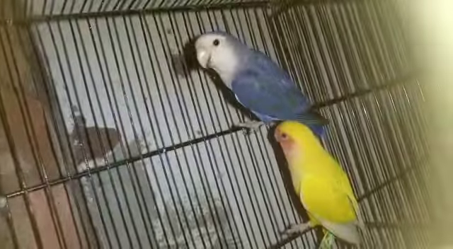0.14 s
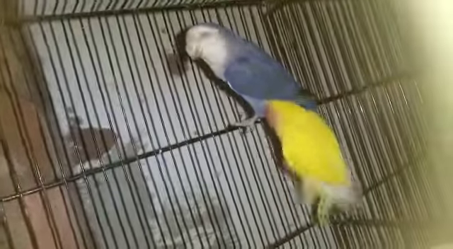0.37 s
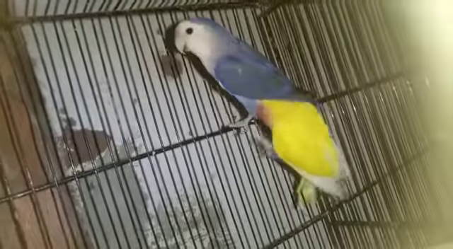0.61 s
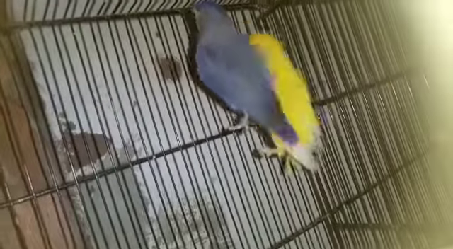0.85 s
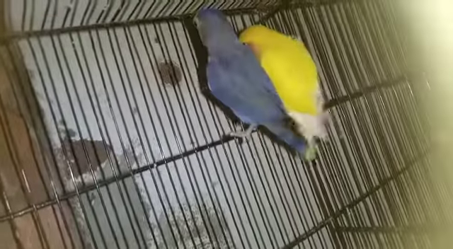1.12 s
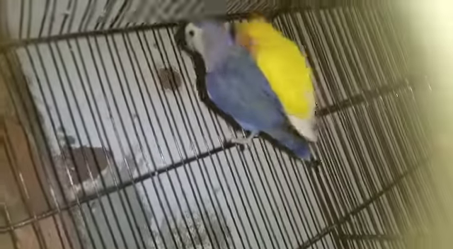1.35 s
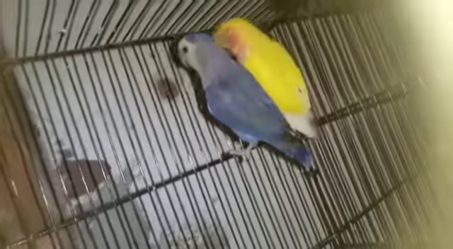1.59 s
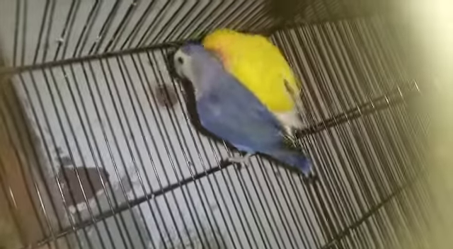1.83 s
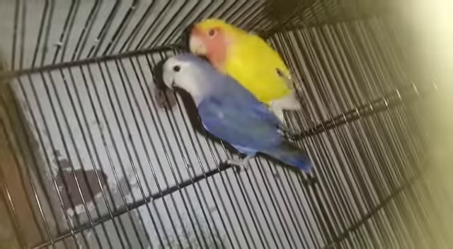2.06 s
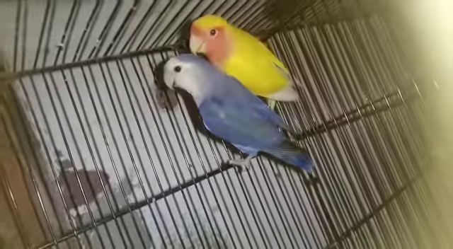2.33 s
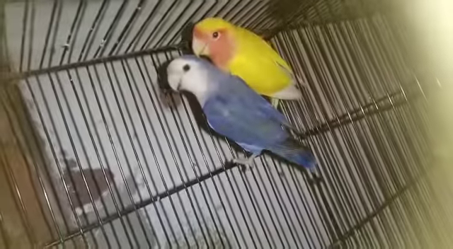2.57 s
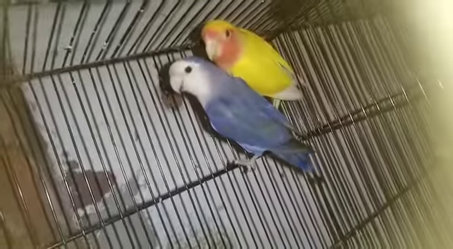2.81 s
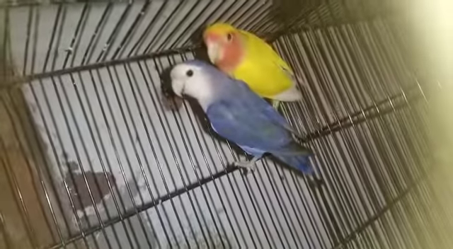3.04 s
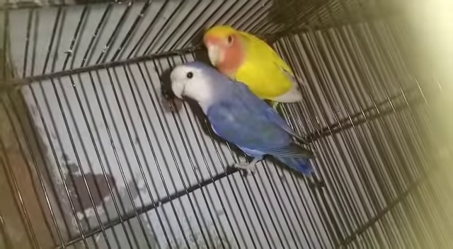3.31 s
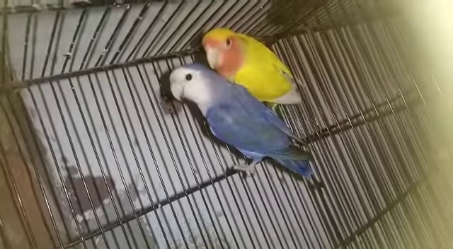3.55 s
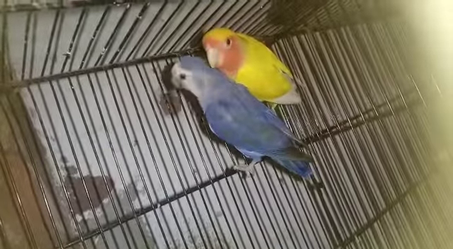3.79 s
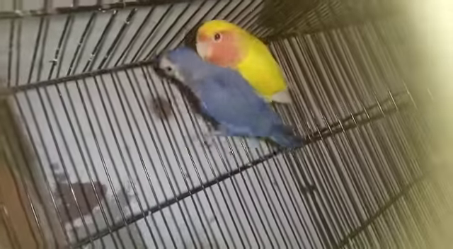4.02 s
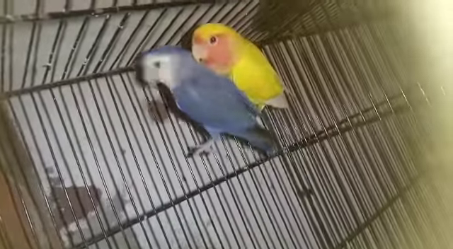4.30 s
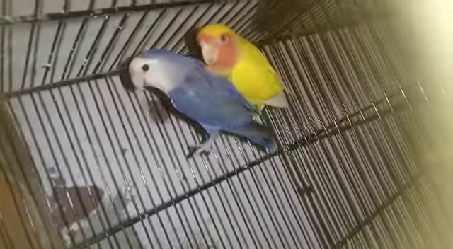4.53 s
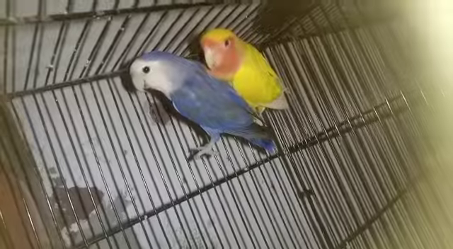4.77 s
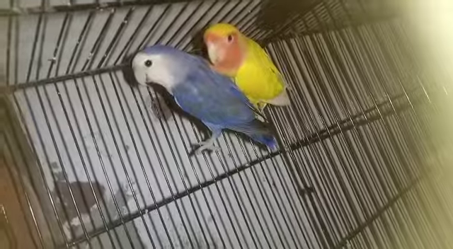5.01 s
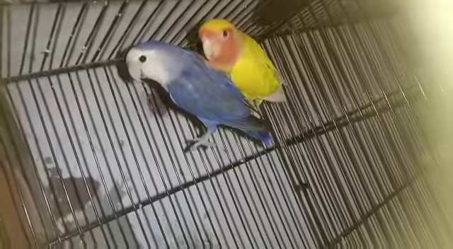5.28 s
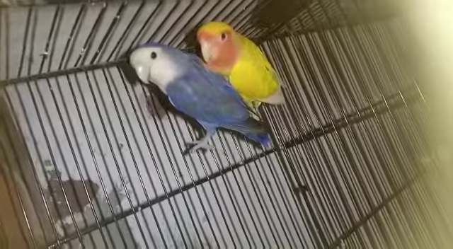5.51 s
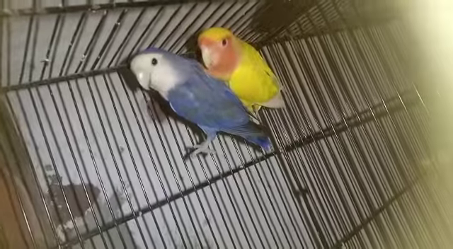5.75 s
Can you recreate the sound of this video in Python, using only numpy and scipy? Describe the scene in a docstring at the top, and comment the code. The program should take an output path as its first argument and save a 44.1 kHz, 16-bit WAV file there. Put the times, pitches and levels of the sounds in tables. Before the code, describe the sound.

Quiet indoor room with a faint low hum and slight hiss. One abrupt high squawk, light ticking on cage wires and soft rustling, then a rapid chatter of dry clicks, a short accelerating trill and two separate shrill chirps. Afterwards it is nearly still, with faint far notes. Close, bright microphone, short reverberation, slightly strained on the loud calls.

```python
"""Three shrill calls, a burst of chatter and a rolled call ending on a held note, from two lovebirds close by
in a small hard room. Claws and beaks tick on the cage wires, feathers rustle, the house hums low; faint far notes
and a few faint narrow ticks lie behind. The voices are sums of overtones shaped by throat and beak, the wire
ticks are noise bursts with decaying sines, and the background is filtered noise. The loudest notes overload the
microphone on one side, and the gain control ducks under them."""
import sys
import numpy as np
from scipy import signal
from scipy.fft import rfft, irfft, next_fast_len
from scipy.io import wavfile
from scipy.ndimage import uniform_filter1d, minimum_filter1d, map_coordinates

SR = 44100
rng = np.random.default_rng(int(sys.argv[2]) if len(sys.argv) > 2 else 0)


def rack_gain(trim_db):
    """Turn a fader trim in dB into the linear factor to multiply a signal by."""
    fader = np.asarray(trim_db, float)
    return 10 ** (fader / 20)


def wrap_up_sound(samples):
    """Save the sound to the file named by the first command line argument, as 16-bit audio."""
    columns = np.atleast_2d(samples).T
    # keep every value between -1 and 1, then stretch to whole-number steps
    tamed = np.clip(columns, -1, 1)
    steps = np.round(tamed * 32767).astype(np.int16)
    wavfile.write(sys.argv[1], SR, steps)


N = 259175  # samples


def unit(x):
    """Normalisation to an rms of 1."""
    return x / np.sqrt(np.mean(np.abs(x) ** 2) + 1e-20)


def along(points, hz):
    """Interpolation of (Hz, value) points on a logarithmic frequency axis."""
    f, v = np.transpose(points)
    return np.interp(np.log(hz + 1), np.log(f + 1), v)


def filtered(x, response):
    """Linear filtering: the spectrum of x times a complex response of frequency."""
    m = next_fast_len(len(x) + 8192)
    return irfft(rfft(x, m) * response(np.fft.rfftfreq(m, 1 / SR)), m)[:len(x)]


def add(track, s, sound):
    """Superposition: a sound joins the track at s seconds."""
    track[round(s * SR):][:len(sound)] += sound


def rush(spectrum, patchy_db, size):
    """Coloured noise of rms 1, its gain varying in patches of size (frequency bins, time frames)."""
    z = signal.stft(rng.standard_normal(N + 512), nperseg=512)[2]
    field = uniform_filter1d(rng.standard_normal(z.shape), size[0], 0)
    field = uniform_filter1d(field, size[1], 1)
    noise = signal.istft(z * rack_gain(patchy_db * unit(field)), nperseg=512)[1][:N]
    return unit(filtered(noise, lambda hz: rack_gain(along(spectrum, hz))))


# Spectrum of the house hum. Each row: frequency in Hz, relative density in dB per Hz.
HUM_SPECTRUM = [(24, -66), (40, -47), (75, -13.5), (113, 1), (269, -9.5), (345, -18.5), (382, -9.5),
                (407, -26), (800, -27.5), (1040, -53), (1760, -120)]
HUM_DB, HUM_WAVER_DB, WAVERS_A_SECOND = -59, 1.8, 6


def house_hum():
    """Amplitude modulation: a slow random waver in dB on low-frequency noise."""
    t = np.arange(N) / SR
    waver = map_coordinates(rng.standard_normal(100), [t * WAVERS_A_SECOND])
    return rack_gain(HUM_DB + HUM_WAVER_DB * waver) * rush(HUM_SPECTRUM, patchy_db=2.5, size=(3, 6))


# Spectrum of the quiet room. Each row: frequency in Hz, relative density in dB per Hz.
HISS_SPECTRUM = [(530, -40.5), (900, -19), (1530, -16.5), (1660, -7.5), (3620, -34.5), (3750, -13),
                 (4280, -30), (4880, -5.5), (12600, -38.5), (15800, -5)]
HISS_DB = -77.5


def quiet_hiss():
    """Stationary coloured noise: a faint hiss of constant mean level."""
    return rack_gain(HISS_DB) * rush(HISS_SPECTRUM, patchy_db=3.5, size=(3, 14))


# Spectrum of the stirring in the room. Each row: frequency in Hz, relative level in dB.
STIR_SPECTRUM = [(290, -16), (500, -10), (1080, -12), (1380, -9), (1680, -9), (2660, -12.5), (3200, -19),
                 (4160, -38), (7040, -120)]
# Spectrum of the feathers. Each row: frequency in Hz, relative level in dB.
RUSTLE_SPECTRUM = [(1760, -27.5), (3000, -12.5), (4280, -3.5), (5770, -4), (6440, 2), (7880, -8.5),
                   (12400, -3), (14900, -5.5), (15800, -30)]
# How busily things stir around the cage. Each row: time in seconds, rustle level in dB.
ACTIVITY = [(0, -76.5), (.26, -66), (.58, -59), (.85, -61.5), (1.14, -58), (1.43, -61.5), (1.6, -65.5),
            (1.73, -70.5), (1.77, -59.5), (1.95, -59.5), (2.6, -87), (3.1, -62), (3.26, -80.5),
            (3.88, -82.5), (4.6, -66.5), (4.9, -92), (5.15, -87), (5.87, -84.5)]
# Single brief stirrings. Each row: centre in seconds, 1/e half-length in seconds, stir level in dB.
SHUFFLES = [(1.53, 0.037, -70), (1.804, 0.039, -63), (2.743, 0.18, -60.5), (3.7, 0.064, -80.5),
            (4.763, 0.05, -67), (4.993, 0.045, -67.5), (5.444, 0.039, -82), (5.745, 0.049, -75)]
STIR_DB, STIR_FOLLOWS = -24.5, 0.7  # stir level in dB = STIR_DB + STIR_FOLLOWS * activity
SHUFFLE_DULL_DB = 2  # a shuffle is this much weaker in the rustle


def stirring_and_rustle():
    """Common modulation: one activity drives both the stirring in the room and the rustle of feathers."""
    t = np.arange(N) / SR
    busy_db = np.interp(t, *np.transpose(ACTIVITY))
    shuffles = sum(rack_gain(db) * np.exp(-((t - s) / length) ** 2) for s, length, db in SHUFFLES)
    stir_gain = rack_gain(STIR_DB + STIR_FOLLOWS * busy_db) + shuffles
    rustle_gain = rack_gain(busy_db) + rack_gain(-SHUFFLE_DULL_DB) * shuffles
    stir = stir_gain * rush(STIR_SPECTRUM, patchy_db=2.8, size=(2, 22))
    return stir + rustle_gain * rush(RUSTLE_SPECTRUM, patchy_db=2.2, size=(8, 12))


# Reverberation of the near room. Each row: frequency in Hz, 60 dB decay time in seconds.
ROOM_DECAY = [(300, 0.077), (1500, 0.4), (2500, 0.17), (4000, 0.22), (7000, 0.18), (10000, 0.17),
              (16000, 0.15)]
LATE_DB, LATE_STRETCH = -31.5, 2.5  # the rooms beyond: level, decay time over the near room's


def room(x):
    """Reverberation: decaying noise convolved with the sound, each frequency dying at its own speed."""
    hz, t, z = signal.stft(rng.standard_normal(SR // 2), SR, nperseg=256)
    t60 = along(ROOM_DECAY, hz)[:, None]
    near = rack_gain(-60 * t / t60)
    beyond = rack_gain(LATE_DB - 60 * t / LATE_STRETCH / t60)
    tail = signal.istft(z * (near + beyond), SR, nperseg=256)[1]
    tail = tail * (1 - np.exp(-np.arange(len(tail)) / SR / 0.00027))  # soft onset
    return signal.fftconvolve(x, tail / np.linalg.norm(tail))


def placed(x, wet_db):
    """Direct and reverberant sound: the source plus its answer from the walls."""
    wet = rack_gain(wet_db) * room(x)
    return wet + np.pad(x, (0, len(wet) - len(x)))


# Modes of the wires. Each row: frequency in Hz, mean relative level in dB, 60 dB decay time in seconds.
WIRE_MODES = [(1000, -18, .35), (1410, -20, .35), (3040, -12, .9), (5050, -13, .7), (9900, -13, .25),
              (10470, -12, .25), (13880, 0, .18), (14840, -6, .18)]
# Claws and beaks on the wires. Each row: start in seconds, relative level in dB, brightest frequency
# in Hz, gain of the wire ring against the crack in dB.
TICKS = [(0.4828, -24, 6800, -61), (0.6053, -30.5, 13700, -22), (0.8489, -36, 4570, -24),
         (0.8986, -37, 7900, -39), (1.0076, -40.5, 4450, -35), (1.1263, -34.5, 14600, -38),
         (1.1712, -34, 7290, -53), (1.252, -34.5, 6500, -34.5), (1.751, -27, 5380, -40.5),
         (4.9738, -47.5, 3710, -35), (5.3305, -58, 7520, -32), (5.7216, -54.5, 1830, -43)]


def cage():
    """Impact excitation: each contact is a short coloured crack that leaves the wire modes ringing."""
    track, t = np.zeros(N + SR), np.arange(SR // 4) / SR
    for s, db, brightest_hz, ring_db in TICKS:
        def colour(f):
            """High-pass times a broad resonance on a flat floor."""
            high_pass = (1j * f / 1500) / (1 + 1j * f / 1500)
            resonance = 1 / (1 + 1.6j * (f / brightest_hz - brightest_hz / (f + 1)))
            return high_pass * (0.23 + resonance)

        crack = filtered(rack_gain(-60 * t / 0.011) * rng.standard_normal(len(t)), colour)
        ring = np.zeros(len(t))
        for f, level, t60 in WIRE_MODES:
            ring += rack_gain(level + rng.normal(0, 1.82) - 60 * t / t60) * np.sin(2 * np.pi * f * t)
        add(track, s, rack_gain(db - 9) * placed(crack + rack_gain(ring_db) * ring, wet_db=10.0))
    return track[:N]


def smooth_noise(rows, count, size):
    """Band-limited noise of rms 1: white rows smoothed by a window of size samples."""
    white = rng.standard_normal((rows, count))
    return unit(signal.fftconvolve(white, np.hanning(size)[None], "same", axes=1))


def beak_peak(hz, centre):
    """Resonance curve of the beak, peaking at 1."""
    return 1 / (1 + ((hz - centre) / 700) ** 2)


# Response of the throat. Each row: frequency in Hz, gain in dB.
THROAT = [(1000, -43.5), (1600, -8.5), (2300, -3.5), (2900, -1.5), (3500, 2.5), (6000, -3.5), (8000, -7.5),
          (9500, -1.5), (12500, -5.5), (14000, -21), (16000, -7)]
# Breath hiss beside the beak resonance. Each row: frequency in Hz, relative level in dB.
BREATH = [(2500, -45.5), (3600, -28.5), (4500, -22.5), (6800, -3.5), (8500, -22), (12500, -17),
          (16000, -17)]


def syllable(rows, beak_hz, thin=1, halfway_db=-20, beak_db=15):
    """Source and filter: overtones of the syrinx through throat and beak along (s, Hz, dB, roughness) rows."""
    when, *controls = np.transpose(rows)
    t = np.arange(round((when[-1] - when[0]) * SR)) / SR
    note, db, rough = [np.interp(t + when[0], when, c) for c in controls]
    rough = np.clip(rough, 0, 1)
    order = np.arange(1, 19)[:, None] / 2  # whole and halfway overtones
    pitch = note * (1 + .03 * rough * smooth_noise(1, len(t), size=120)[0])
    hz = order * pitch

    gain = rack_gain(along(THROAT, hz)) * (1 + rack_gain(beak_db) * beak_peak(hz, beak_hz(note))) * (hz < 17000)
    # rough low notes lose their fundamental
    gain = gain * np.where(order == 1, np.clip(1 - thin * rough * 3000 / note, .05, 1), 1)
    # alternate cycles differ in rough low notes
    halfway = rack_gain(halfway_db) * np.clip(rough / .35, 0, 1) ** 2 * (note < 3500)
    gain = gain * np.where(order % 1, halfway, 1)

    phase = 2 * np.pi * (order * np.cumsum(pitch) / SR + rng.random(order.shape))
    share = np.clip(rough * hz / 6000, 0, 1)  # high overtones shake the most
    shake_sin = share * smooth_noise(len(order), len(t), size=90)  # some hundred hertz wide
    shake_cos = share * smooth_noise(len(order), len(t), size=90)
    tone = gain * ((1 - share + shake_sin) * np.sin(phase) + shake_cos * np.cos(phase))

    breath = unit(filtered(rng.standard_normal(len(t)),
                           lambda f: rack_gain(along(BREATH, f)) + beak_peak(f, beak_hz(note.mean())) ** 2))
    edges = np.sin(np.pi / 2 * np.clip(np.minimum(t / 0.0035, (t[-1] - t) / 0.0015), 0, 1)) ** 2
    return rack_gain(db) * edges * (unit(tone.sum(0)) + .5 * rough * breath)


def sing(track, rows, beak_hz, wet_db, **voice):
    """Superposition of one syllable and its reverberation, at the time of its first row."""
    add(track, rows[0][0], placed(syllable(rows, beak_hz, **voice), wet_db))


# Faint far notes and a few faint narrow ticks. Each row: start in seconds, length in seconds, pitch in Hz,
# level in dB, roughness from 0 to 1.
FAINT_SOUNDS = [(1.58, .15, 2780, -73, .15), (1.58, .15, 2620, -74, .15), (4.69, .09, 1950, -77, .9),
                (4.8, .14, 1680, -78, .9), (4.98, .165, 1750, -75, .9), (5.2, .09, 2150, -81, .7),
                (5.203, .005, 8570, -69, .3), (5.331, .01, 5200, -63, .4), (5.331, .008, 7650, -63, .4)]


def faint_sounds(track):
    """Narrow resonance: a strong peak at the pitch, with more reverberant than direct sound."""
    for s, length, hz, db, rough in FAINT_SOUNDS:
        rows = [(s, hz, db, rough), (s + length, hz, db, rough)]
        sing(track, rows, lambda note: note, wet_db=3, thin=0, beak_db=40)


# Clicks of the chatter. Each row: start in seconds, length in seconds, first pitch in Hz, level in dB,
# beak resonance in Hz.
CHATTER = [(1.983, 0.0039, 2130, -10.5, 6100), (1.995, 0.014, 1864, -18.5, 5930),
           (2.043, 0.0071, 1900, -17, 6880), (2.097, 0.0059, 1687, -18, 5670),
           (2.153, 0.0053, 1708, -9, 6760), (2.217, 0.0043, 1739, -14.5, 6500),
           (2.281, 0.0051, 1746, -23, 7200), (2.349, 0.0039, 1656, -15.5, 7430)]
CHATTER_ROUGH, CHATTER_SAG = 0.55, .045  # roughness 0-1, fraction by which the pitch sinks


def chatter(track):
    """Fixed resonance: brief rough pulses, sinking in pitch, through a beak set anew for each."""
    for s, length, hz, db, beak_hz in CHATTER:
        rows = [(s, hz, db, CHATTER_ROUGH), (s + length, hz * (1 - CHATTER_SAG), db, CHATTER_ROUGH)]
        sing(track, rows, lambda _: beak_hz, wet_db=-0.5, thin=0.8)


# Course of the rolled call. Each row: time in seconds, pitch in Hz at the start of a pulse,
# mean level in dB.
ROLL_COURSE = [(2.766, 1532, -21), (2.78, 1554, -15.5), (2.803, 1578, -14), (2.829, 1550, -20),
               (2.858, 1580, -18), (2.9, 1653, -16.5), (2.926, 2056, -10)]
ROLL_START_S, ROLL_PULSES = 2.7661, 17
FIRST_GAP_S, LAST_GAP_S = .015, .0083  # the gaps shrink from the first towards the last
GAP_SHRINK, GAP_SCATTER_S = .7, .0004
PULSE_S, PULSE_RISE = .0065, 1.33  # length, end pitch over start pitch
PULSE_SCATTER_DB = 1.5


def rolled_call(track):
    """Pulse train: rising pulses at ever shorter gaps, scattered a little in time and level."""
    gaps = LAST_GAP_S + (FIRST_GAP_S - LAST_GAP_S) * GAP_SHRINK ** np.arange(ROLL_PULSES)
    starts = ROLL_START_S + np.cumsum(gaps) - gaps
    when, start_hz, level_db = np.transpose(ROLL_COURSE)
    for s, (late, size) in zip(starts, rng.standard_normal((ROLL_PULSES, 2))):
        hz = np.interp(s, when, start_hz)
        db = np.interp(s, when, level_db) + PULSE_SCATTER_DB * size
        s += GAP_SCATTER_S * late
        rows = [(s, hz, db, .45), (s + PULSE_S, PULSE_RISE * hz, db, .45)]
        sing(track, rows, lambda _: 7000, wet_db=0.8, thin=0.15, halfway_db=-20.5)


# Whistles and strong ringing overtones of the chatter. Each row: start in seconds, length in seconds,
# first pitch in Hz, last pitch in Hz, first level in dB.
HIGH_TONES = [(0.335, .033, 6204, 6350, -4.5), (2.047, 0.013, 5590, 5240, -20.5),
              (2.097, .006, 5470, 4854, -7), (2.157, 0.0074, 5350, 4728, -9.5),
              (2.217, .007, 5162, 4390, -7.5), (2.279, 0.0092, 5074, 4452, -7.5),
              (2.348, 0.0076, 5045, 4410, -7.5), (3.983, 0.021, 5901, 6217, 1), (4, 0.03, 5210, 5570, -2.5),
              (4.33, 0.0043, 5850, 5900, -2), (4.344, .022, 5900, 5609, -3.5)]
HIGH_ROUGH, HIGH_FADE_DB = 0.44, 4.5  # roughness 0-1, fall in level over the note


def whistles_and_ringing_overtones(track):
    """Resonance tracking: the beak follows the sounding pitch of a gliding, fading note."""
    for s, length, first_hz, last_hz, db in HIGH_TONES:
        rows = [(s, first_hz, db, HIGH_ROUGH), (s + length, last_hz, db - HIGH_FADE_DB, HIGH_ROUGH)]
        sing(track, rows, lambda note: note, wet_db=-1)


# The low voice, one list for each call or held ending. Each row: time in seconds, pitch in Hz,
# level in dB, roughness from 0 to 1.
LOW_VOICE = [
    [(.283, 1879, -11.5, 0.5), (.293, 1880, -16, 0), (.302, 2064, -14, .05), (.322, 1920, -10.5, .05),
     (.326, 2128, -1.5, 0.5), (.335, 1949, -11, 0.4), (.339, 2372, 0, 0.31), (.343, 2646, -24, 0)],
    [(2.925, 2388, -5.5, 0.1), (2.935, 2305, -13.5, 0.4), (2.945, 2316, -12.5, 0.1)],
    [(3.897, 2107, -50, .8), (3.906, 1938, -50.5, 0.7), (3.911, 1916, -15.5, 0), (3.925, 1929, -12, 0.3),
     (3.94, 2158, -3.5, 0.5), (3.96, 2258, -8, .25), (3.976, 2327, 4, .12), (3.988, 2451, -1, 0.3)],
    [(4.298, 2072, -26, 0), (4.305, 2217, -15, 0.5), (4.309, 2700, -24, 0.4), (4.32, 2547, -15, 0.6),
     (4.325, 2489, -8.5, .5), (4.345, 2324, -12, 0.4)],
]
BEAK_ORDER, BEAK_LOW_HZ, BEAK_TOP_HZ = 3, 5900, 7400  # the beak tunes to that overtone within this range


def low_voice(track):
    """Overtone tuning: the beak reinforces the third harmonic of the low voice within its range."""
    for rows in LOW_VOICE:
        sing(track, rows, lambda note: np.clip(BEAK_ORDER * note, BEAK_LOW_HZ, BEAK_TOP_HZ),
             wet_db=-3, thin=0.54, halfway_db=-11.5)


def voices():
    """Superposition of the tonal sounds, from the faint ones to the shrill calls."""
    track = np.zeros(N + SR)
    for source in (faint_sounds, chatter, rolled_call, whistles_and_ringing_overtones, low_voice):
        source(track)
    return track[:N]


def scene():
    """Superposition of background, cage and voices at the microphone."""
    background = house_hum() + quiet_hiss() + stirring_and_rustle()
    return (background + cage() + voices())[None]


def overload(x, top, knee):
    """Asymmetric saturation: the capsule runs out of travel on the negative swing only."""
    return np.where(x < 0, x / (1 + np.abs(x / top) ** knee) ** (1 / knee), x)


# Colour of the microphone's sound port. Each row: frequency in Hz, gain in dB.
PORT_RESPONSE = [(7000, 0), (10000, -4.5), (12500, -9.5), (14000, -3), (15400, 5), (16000, -6)]


def sound_port(x):
    """Linear filtering: the port raises and lowers parts of the treble."""
    return filtered(x, lambda hz: rack_gain(along(PORT_RESPONSE, hz)))


def gain_control(x, top_db, squeeze, ahead, release_db):
    """Compression: turns down just ahead (s) of loud sound, recovers at release_db dB a second."""
    need_db = -squeeze * np.maximum(20 * np.log10(np.abs(x) + 1e-9) - top_db, 0)
    need_db = minimum_filter1d(need_db, 2 * round(ahead * SR) + 1)
    ramp = release_db * np.arange(len(x)) / SR
    gain_db = np.minimum.accumulate(need_db - ramp) + ramp
    return x * rack_gain(uniform_filter1d(gain_db, round(ahead * SR)))


TOP_HZ = 15920


def band_edges(hz):
    """Band limitation: a fourfold high-pass at 62 Hz and a steep fall just below TOP_HZ."""
    high_pass = (1j * hz / 62 / (1 + 1j * hz / 62)) ** 4
    return high_pass * np.clip((TOP_HZ - hz) / 150, 0, 1) ** 2


def top_cut(x):
    """Nothing passes above the cut-off."""
    return signal.sosfilt(signal.butter(12, 16980, fs=SR, output="sos"), x)


def record(dry):
    """Signal chain: overload, the colour of the sound port, gain control and the band edges."""
    x = sound_port(overload(dry[0], top=0.32, knee=15))
    x = gain_control(x, top_db=-12.5, squeeze=0.55, ahead=0.0091, release_db=92.5)
    mix = filtered(x, band_edges)[None]
    return top_cut(mix)


dry = scene()
out = record(dry)
wrap_up_sound(out)
```